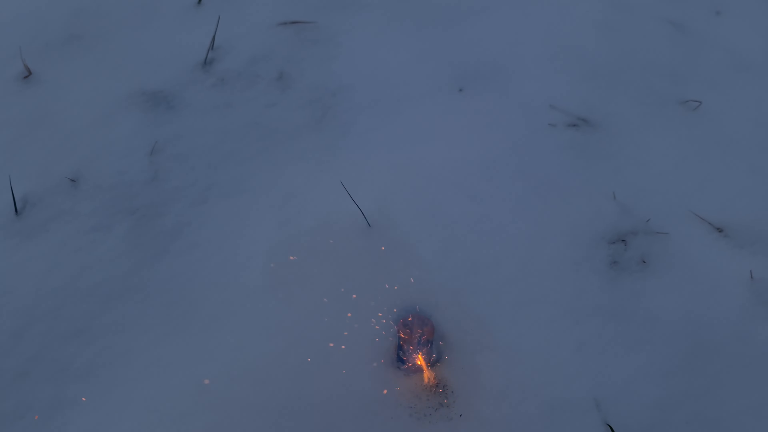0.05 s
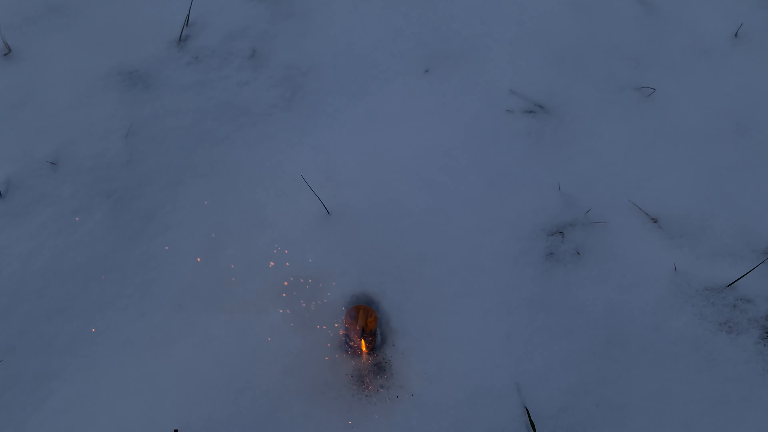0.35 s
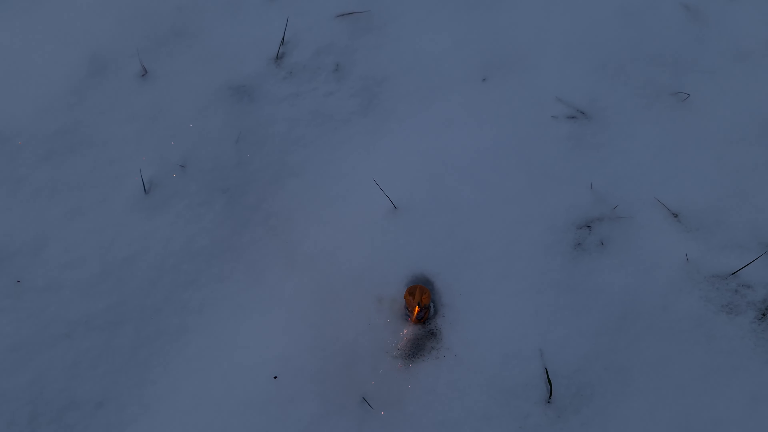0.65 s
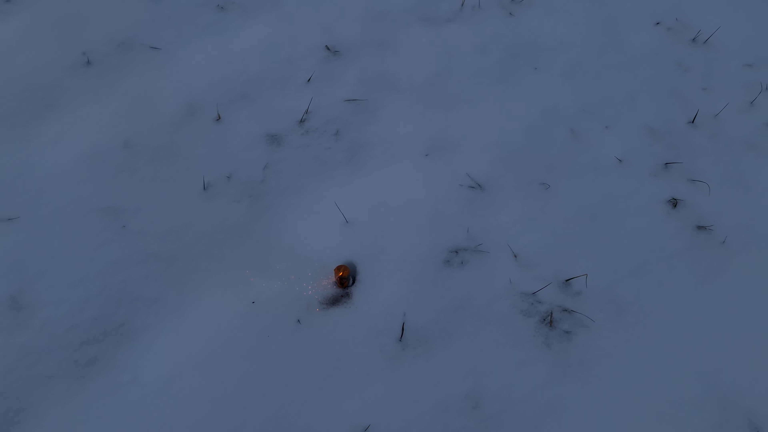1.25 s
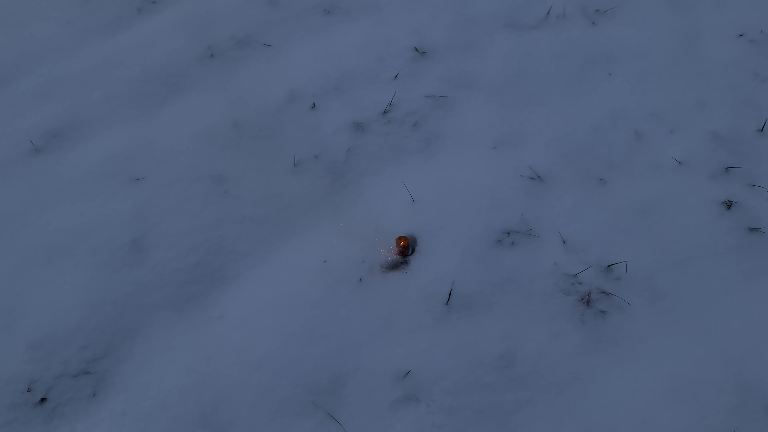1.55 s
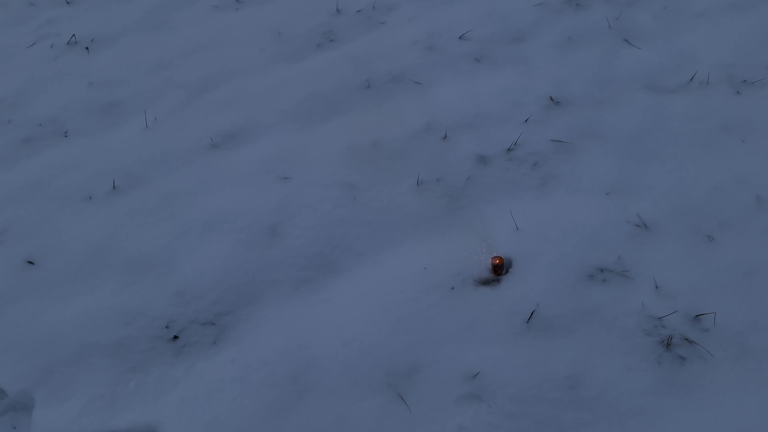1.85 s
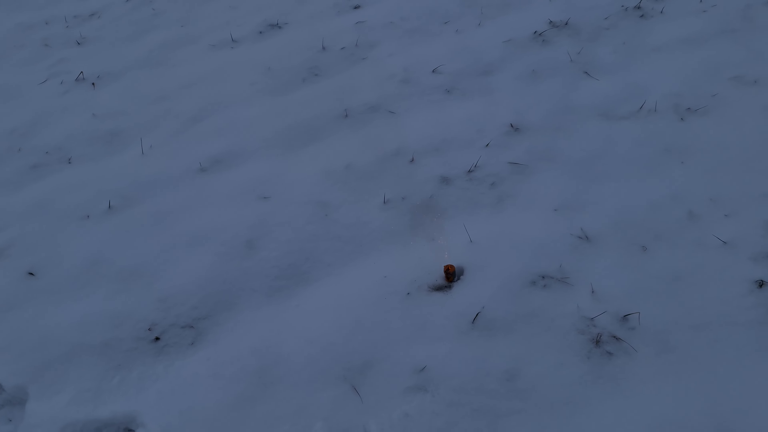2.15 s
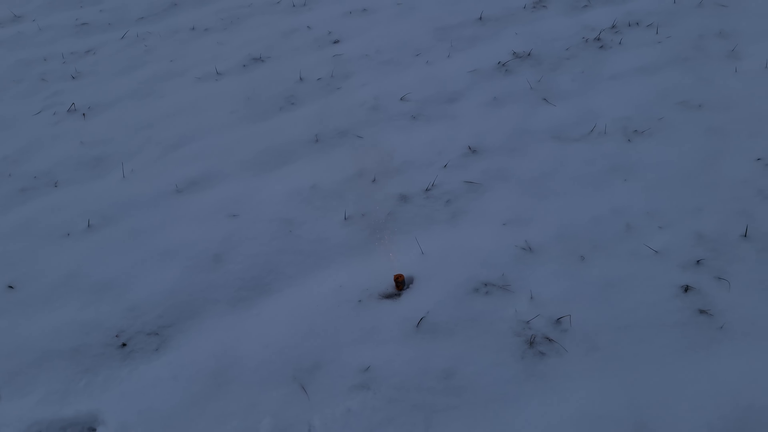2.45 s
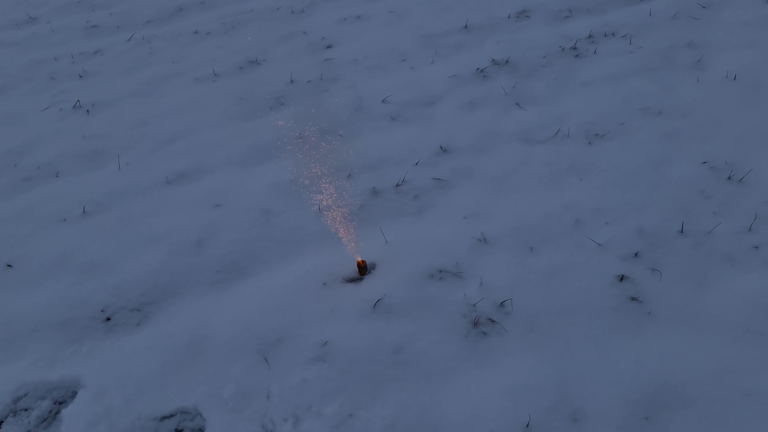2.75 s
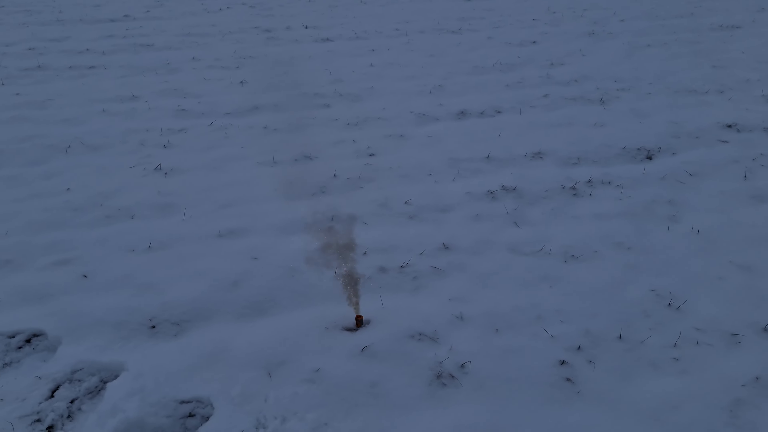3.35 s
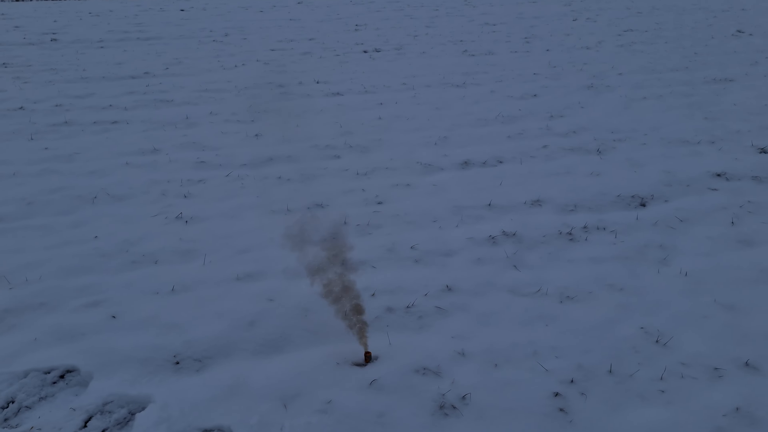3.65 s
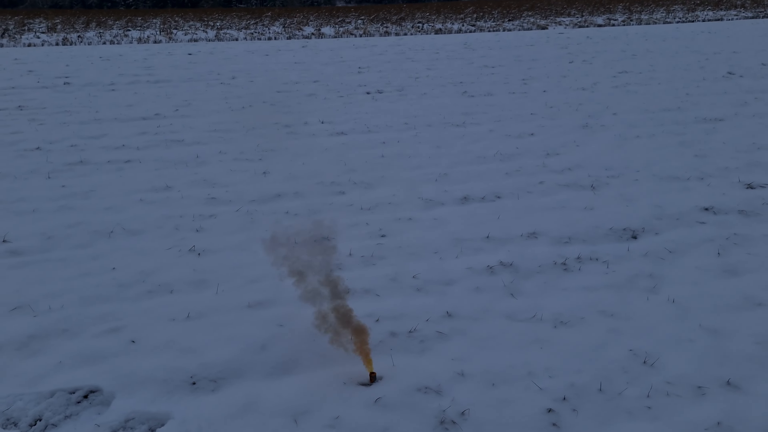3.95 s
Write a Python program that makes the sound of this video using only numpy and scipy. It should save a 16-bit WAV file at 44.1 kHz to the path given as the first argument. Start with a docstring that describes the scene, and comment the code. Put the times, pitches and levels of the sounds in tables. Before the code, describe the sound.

A smoke torch hisses and fizzes on open snow, its low roar fading as the microphone backs away. It spits one short burst of sparks, then hisses on more brightly. Soft handling thumps and faint rumble come and go.

```python
"""A smoke torch burns on open snow: its jet of hot gas roars, hisses and fizzes.
Once the nozzle spits a shower of sparks, then hisses on more brightly. The microphone backs away
and swings about, hearing the torch through two small openings, its left and right ports.
Early on, a close echo sweeps through the treble. Handling the microphone adds soft thumps,
a few dull knocks, one sharp click and a low rumble."""
import sys
import numpy as np
from scipy import signal
from scipy.fft import rfft, irfft
from scipy.io import wavfile

SR = 44100
rng = np.random.default_rng(int(sys.argv[2]) if len(sys.argv) > 2 else 0)


def transcribe(signal):
    """Save signal, clipped to [-1, 1], as a 16-bit WAV file at the path in sys.argv[1]."""
    frames = np.atleast_2d(signal).T
    limited = np.clip(frames, -1, 1)
    pcm = np.round(limited * 32767).astype(np.int16)
    wavfile.write(sys.argv[1], SR, pcm)


N = 176400
T = np.arange(N) / SR
HZ = np.maximum(np.fft.rfftfreq(N, 1 / SR), 1)
SOUND_M_S = 343
SIDES = (1, -1)  # left, right


def torch():
    """Everything the burning torch sends out."""
    return roar() + hiss() + whistle() + fizz() + spit()


def gas(cracks_per_s=2700, spread_db=1.5):
    """Swirling gas makes noise; burning grains add tiny cracks to it."""
    cracks = (rng.random(N) < cracks_per_s / SR) * rng.choice([-1, 1], N)
    sizes = amp(spread_db * np.minimum(rng.exponential(size=N), 5))
    return unit(rng.standard_normal(N) + amp(-9.5) * unit(cracks * sizes))


# How loud the roar is, falling with distance: t/s, level/dB
ROAR_LEVEL = [(0, -37.5), (.3, -35.5), (.48, -38), (.75, -43), (1.2, -47), (1.9, -50), (2.12, -57.5),
              (2.35, -54), (2.55, -50.5), (3.0, -70), (3.2, -56), (3.66, -50), (3.83, -60), (4, -51.5)]
# The roar's mix of low and high sound: f/Hz, level/dB
ROAR_COLOUR = [(40, -4), (130, 4), (220, 0.5), (310, -4.5), (440, 4.5), (620, 0.5), (900, 1), (1350, 2),
               (1800, -1), (2500, -1), (3600, -1), (7000, -16.5), (16000, -38)]
# A moving dip in that mix (a negative depth is a bump): t/s, f/Hz, depth/dB
ROAR_DIP = [(0, 320, -3.5), (.8, 328, 2), (1.3, 307, 6), (2.35, 525, 4.5), (2.9, 520, 0), (3.25, 577, 22),
            (3.55, 610, 11), (4, 620, -2.5)]

def roar(dip_octaves=.45):
    """The jet's low, sputtering roar, which at times sounds hollow."""
    centre, depth_db = curve(ROAR_DIP), curve(ROAR_DIP, 2)

    def dip(hz, at):
        return amp(-depth_db[at] * np.exp(-(np.log2(hz / centre[at]) / dip_octaves) ** 2))
    noise = moving_filter(colour(gas(), ROAR_COLOUR), dip, size=2048)
    flutter_db = .63 * wander(hz=45)
    return amp(curve(ROAR_LEVEL) + flutter_db) * noise


# How loud and how high the hiss is: t/s, level/dB, f/Hz
NOZZLE_HISS = [(0, -57, 3600), (.2, -48.5, 3800), (.48, -39, 3760), (.75, -49.5, 3600), (1.3, -49, 3650),
               (1.7, -48, 3660), (2.15, -48.5, 4330), (2.35, -44, 4550), (2.6, -41.5, 4600),
               (3.0, -47, 4940), (3.3, -43, 4640), (3.7, -42, 4900), (4, -42, 5300)]

def hiss(width_octaves=.71, steepness=1.92):
    """The nozzle rings broadly as gas rushes through: a hiss that drifts higher."""
    centre = curve(NOZZLE_HISS, 2)

    def band(hz, at):
        distance = np.log2(hz / centre[at]) / width_octaves
        return (1 + distance ** 2) ** (-steepness / 2) / np.sqrt(centre[at])
    return amp(curve(NOZZLE_HISS)) * unit(moving_filter(gas(), band))


# How loud the whistle is: t/s, level/dB
WHISTLE_LEVEL = [(0, -59), (1.2, -59.5), (1.7, -53.5), (2.1, -60), (2.45, -56), (2.65, -48), (3.1, -64),
                 (4, -59)]

def whistle(hz=3560, width_octaves=.14):
    """The nozzle also rings near one pitch: a faint, breathy whistle."""
    band = 1 / (1 + (np.log2(HZ / hz) / width_octaves) ** 2)
    return amp(curve(WHISTLE_LEVEL)) * unit(filtered(gas(), band))


# How loud the fizz is: t/s, level/dB, its highest layer relative to that level/dB
FIZZ_LEVEL = [(0, -55, -6), (.06, -51.5, 4), (.12, -42.5, -1), (.25, -40.5, 1.5), (.42, -38.5, 1),
              (.55, -39, 8.5), (.7, -45, 2.5), (1.15, -47.5, 8), (1.4, -50.5, 8), (1.7, -52, 5.5),
              (1.97, -68, 7), (2.15, -54, 0), (2.55, -51, 5), (3.0, -44, -2), (3.16, -45, -11),
              (3.4, -45.5, -8), (3.7, -45, -4), (4, -47, -8)]
# Tone of the fizz: f/Hz, level/dB
FIZZ_COLOUR = [(2500, -25.5), (5000, -8.5), (7000, -5), (8600, -2), (11500, 2), (13000, -16), (16000, -35)]
# Tone of its highest layer: f/Hz, level/dB
TOP_COLOUR = [(9000, -36), (11500, 1), (13000, 2.5), (16000, 2.5)]

def fizz():
    """The burning charge fizzes in two layers of very high noise."""
    body = colour(gas(), FIZZ_COLOUR)
    top = amp(curve(FIZZ_LEVEL, 2)) * colour(gas(), TOP_COLOUR)
    return amp(curve(FIZZ_LEVEL)) * (body + top)


# Tone of the spark shower: f/Hz, level/dB
SPIT_COLOUR = [(200, -26.5), (600, -17), (1200, -9.5), (2400, -9.5), (3500, -4), (5500, -4.5), (7000, -7.5),
               (9500, -11.5), (12500, -10), (16000, -10)]

def spit(start_s=2.615, rise_s=.075, hold_s=.04):
    """The nozzle blows out sparks: a quick swell whose high sounds die first."""
    swell = np.clip((T - start_s) / rise_s, 0, 1) ** 1.48
    fading_s = np.maximum(T - start_s - rise_s - hold_s, 0)

    def fade(hz, at):
        db_per_s = 80 * (np.maximum(hz, 500) / 5000) ** .55
        return amp(-db_per_s * fading_s[at])
    return amp(-24.5) * swell * moving_filter(colour(gas(), SPIT_COLOUR), fade)


# Sound thrown back by the snow, relative to the direct sound: t/s, level/dB
SNOW_LEVEL = [(0, -8), (.5, -9.5), (.7, -12), (1.6, -15), (2.0, -22), (2.5, -19), (4, -14)]

def snow_scatter(direct, diffuse, from_hz=1200):
    """Left and right mixes of the torch and what the snow scatters, mostly its shorter waves."""
    share = amp(curve(SNOW_LEVEL))
    scattered = share * filtered(diffuse, HZ / np.hypot(HZ, from_hz))
    return [(direct + side * scattered) / np.hypot(1, share) for side in SIDES]


# Where the torch is as the microphone swings: t/s, angle to the left/degrees, treble left minus right/dB
TORCH_DIRECTION = [(0, 27, -1), (.4, 29, -1), (.55, 17, 0), (.72, -5, -2), (.88, -8, -2), (1.05, -2.4, -1),
                   (1.3, 13, -1), (1.6, 0, -2), (1.8, -24, -3), (1.97, -40, -4), (2.3, -21, -1),
                   (2.5, -12, 0), (2.68, 0, 0), (2.9, 10, 1), (3.17, 13, 1), (3.25, 0, 2), (4, 0, 2)]
# Tone of each port: f/Hz, left level/dB, right level/dB
PORT_COLOUR = [(196, -0.5, -1.5), (407, -1.5, 0.5), (626, -5, -5), (780, -0.5, 1), (1100, -3, 1),
               (1290, 1.5, -0.5), (2350, -1.5, -1.5), (2770, -2.5, -1.5), (3660, 1.5, -1),
               (4210, -1.5, -1.5), (5620, 4, -0.5), (6770, 2.5, 1.5), (8260, -2.5, 4.5), (8940, 5, 2),
               (9400, 0.5, -2.5), (12400, -5, 0), (13000, -2, -0.5), (14400, -11, -1.5), (15500, -5, -4)]
# How far the left port leads for sound from straight ahead: f/Hz, phase/radians
PORT_PHASE = [(200, 0), (2400, 0), (3500, .2), (5900, -.4), (6700, -.1), (7500, .9), (8100, .9),
              (10400, -.7), (11700, -.8), (14000, -.3), (16000, 0)]

def port(x, side, gap_m=.05, full_shadow_hz=11100):
    """One port hears the torch with its own delay, treble shadow and tone."""
    lead_s = gap_m / SOUND_M_S * np.sin(np.radians(curve(TORCH_DIRECTION)))
    pan_db = curve(TORCH_DIRECTION, 2)

    def direction(hz, at):
        shadow = amp(side * pan_db[at] / 2 * np.minimum(hz / full_shadow_hz, 1))
        return shadow * np.exp(1j * np.pi * side * hz * lead_s[at])
    tone = amp(over_hz(PORT_COLOUR, 1 if side == 1 else 2))
    phase_shift = np.exp(.5j * side * over_hz(PORT_PHASE))
    return filtered(moving_filter(x, direction), tone * phase_shift)


# An echo off something close to the right port: t/s, extra path/m, level/dB
CLOSE_ECHO = [(0, .092, -20), (.42, .09, -12), (.5, .082, -6), (.57, .075, -7), (.68, .068, -7),
              (.76, .076, -4), (.82, .085, -7), (1.2, .088, -24)]

def close_echo(x, from_hz=6500):
    """An echo with a changing path swishes the treble up and down; longer waves hardly bounce."""
    delay_s, strength = curve(CLOSE_ECHO) / SOUND_M_S, amp(curve(CLOSE_ECHO, 2))

    def comb(hz, at):
        echo = strength[at] / (1 + (from_hz / hz) ** 4)
        return (1 + echo * np.exp(-2j * np.pi * hz * delay_s[at])) / np.hypot(1, echo)
    return moving_filter(x, comb)


# Handling thumps: t/s, level/dB, f/Hz, left minus right/dB, rubbing relative to the thump/dB
THUMPS = [(0.766, -30, 72, -5, -17), (0.812, -23, 70, -12, -18), (1.166, -25, 76, -9, -14),
          (1.222, -22, 87, -12, -10), (1.258, -20.5, 62, 2, -14), (1.415, -30, 54, -8, -26),
          (2.145, -32, 52, 11, -24), (2.281, -30, 90, -7, -9), (2.302, -23, 75, -3, -12),
          (2.516, -35, 110, -1, -10), (2.552, -28.5, 105, -5, -13), (2.611, -29, 79, -3, -14),
          (2.636, -25.5, 95, -1, -12), (2.685, -31, 72, -3, -18), (2.797, -23.5, 69, 2, -18),
          (2.865, -27, 99, 6, -15), (2.897, -28.5, 56, 9, -16), (2.923, -29, 72, 15, -14),
          (2.95, -23, 85, 9, -13), (2.983, -27, 70, 6, -17), (3.012, -27, 108, 11, -8),
          (3.146, -27, 91, 5, -14), (3.18, -30, 72, 5, -20), (3.256, -37, 80, 6, -9),
          (3.76, -29, 85, 0, -12), (3.789, -25, 65, 0, -16), (3.82, -27, 63, 6, -16),
          (3.869, -21, 73, 7, -15), (3.9, -26, 105, -3, -9)]
# Tone of the rubbing: f/Hz, level/dB
RUB_COLOUR = [(30, -3), (70, 1.5), (130, 3), (230, -10), (330, -23.5), (600, -35.5), (2000, -38.5)]

def thumps(shove_s=.0091, rub_s=.011, out_of_step=.43):
    """Soft shoves of a wave or two, out of step in the two ports, each with a little rubbing."""
    out, side = np.zeros((2, N)), np.array(SIDES)[:, None]
    rub = colour(rng.standard_normal(N), RUB_COLOUR)
    for s, db, hz, pan_db, rub_db in THUMPS:
        phase, offset = rng.uniform(-np.pi, np.pi, 2)
        near = np.abs(T - s) < .1
        t = T[near] - s
        wave = np.cos(2 * np.pi * hz * t + phase + side * out_of_step * offset)
        shove = wave / np.cosh(np.sqrt(2) * t / shove_s)
        rubbing = amp(rub_db) * rub[near] * np.exp(-.5 * (t / rub_s) ** 2)
        out[:, near] += amp(db) * unit(amp(side * pan_db / 2)) * (shove + rubbing)
    return out


# Knocks on the grip: t/s, level/dB, f/Hz above which the knock is muffled
KNOCKS = [(1.513, -44, 800), (1.837, -43.5, 800), (1.916, -34.5, 413), (1.932, -38, 350), (2.286, -33, 700),
          (2.291, -45, 1400), (2.305, -45, 350), (2.586, -39, 600), (2.594, -36, 900), (3.035, -46, 1100),
          (3.627, -43.5, 1800)]
# Tones the grip rings with: f/Hz, level/dB, decay/s
GRIP_TONES = [(393, 3, 0.0022), (624, 5, 0.00079), (1150, 1, 0.0044), (1390, -3.5, 0.0032)]

def knocks(rise_s=.00044):
    """Soft contact rings mostly the grip's low tones: dull knocks, alike on both sides."""
    out = np.zeros(N)
    for s, db, soft_hz in KNOCKS:
        for k, (hz, tone_db, decay_s) in enumerate(GRIP_TONES):
            tone = ring(s, db + tone_db, hz, rise_s, decay_s)
            out += (-1) ** k * tone / np.sqrt(1 + (hz / soft_hz) ** 4)
    return out


# Tones the casing rings with: f/Hz, level/dB, decay/s
CASING_TONES = [(1930, -26.5, 0.0021), (3450, -42, 0.00072), (4440, -24, 0.0011)]
# Tone of the casing's crack: f/Hz, level/dB
CRACK_COLOUR = [(1000, -18), (2000, -2), (6000, -13), (8300, -7), (11700, 1), (14000, -9), (16000, 0)]

def click(catch_s=1.2402, rise_s=.00029, crack_s=1.2415, crack_decay_s=.00066):
    """The casing catches and rings, then lets go with a crack that is louder on the right."""
    ringing = sum(ring(catch_s, db, hz, rise_s, decay_s) for hz, db, decay_s in CASING_TONES)
    age = np.maximum(T - crack_s, 0) / crack_decay_s
    crack = age * np.exp(1 - age) * stereo_noise(CRACK_COLOUR)
    return ringing + amp([[-21.5], [-13.5]]) * crack


# How loud the rumble is: t/s, level/dB
RUMBLE_LEVEL = [(0, -80), (.45, -55.5), (.7, -40), (1.05, -44.5), (1.35, -45), (1.7, -57.5), (1.8, -42.5),
                (1.93, -49), (2.08, -36.5), (2.22, -44), (2.9, -36.5), (3.4, -43.5), (4, -40)]
# Tone of the rumble: f/Hz, level/dB
RUMBLE_COLOUR = [(15, -7), (35, 7), (60, 11), (90, 3), (140, -14), (250, -30), (600, -40), (2000, -47)]

def rumble():
    """Handling makes a faint, deep rumble that comes and goes."""
    return amp(curve(RUMBLE_LEVEL) + 3 * wander(hz=12)) * stereo_noise(RUMBLE_COLOUR)


def amp(db):
    """Turn decibels into a multiplier."""
    return 10 ** (np.asarray(db) / 20)


def unit(x):
    """Scale x to an average strength (rms) of 1."""
    return x / np.sqrt(np.mean(x ** 2))


def curve(table, column=1):
    """Join a column's values with straight lines over time."""
    rows = np.array(table)
    return np.interp(T, rows[:, 0], rows[:, column])


def over_hz(table, column=1):
    """Join a column's values with straight lines over log frequency."""
    rows = np.array(table)
    return np.interp(np.log(HZ), np.log(rows[:, 0]), rows[:, column])


def filtered(x, gain):
    """Multiply each frequency in x by its gain."""
    return irfft(rfft(x) * gain, N)


def colour(x, table):
    """Give x the tone in a table, at strength 1."""
    return unit(filtered(x, amp(over_hz(table))))


def stereo_noise(table):
    """Separate left and right noises with the same tone."""
    return np.array([colour(rng.standard_normal(N), table) for _ in SIDES])


def wander(hz):
    """Smooth random motion of strength 1, mostly slower than hz."""
    return unit(filtered(rng.standard_normal(N), 1 / (1 + (HZ / hz) ** 4)))


def moving_filter(x, gain, size=512):
    """Filter x with gain(Hz, sample index), which may change over time."""
    hz, s, slices = signal.stft(x, SR, nperseg=size)
    at = np.minimum((s * SR).astype(int), N - 1)
    return signal.istft(slices * gain(np.maximum(hz, 1)[:, None], at), SR, nperseg=size)[1][:N]


def ring(s, db, hz, rise_s, decay_s):
    """One struck tone that starts at time s and dies quickly."""
    t = np.arange(SR // 20) / SR
    shape = (1 - np.exp(-t / rise_s)) * np.exp(-t / decay_s)
    return np.interp(T, s + t, amp(db) * shape / shape.max() * np.sin(2 * np.pi * hz * t))


def scene():
    """The unsteadily burning torch, heard through both ports, plus the handling."""
    burn = amp(.85 * wander(hz=27) + .56 * wander(hz=109))  # swells and faster sputters
    left, right = snow_scatter(direct=burn * torch(), diffuse=burn * torch())
    heard = np.array([port(left, side=1), close_echo(port(right, side=-1))])
    return heard + rumble() + thumps() + knocks() + click()


def record(dry):
    """The recorder cuts off everything above 15850 Hz."""
    return signal.sosfilt(signal.ellip(10, .1, 80, 15850, fs=SR, output="sos"), dry)


dry = scene()
out = record(dry)
transcribe(out)
```